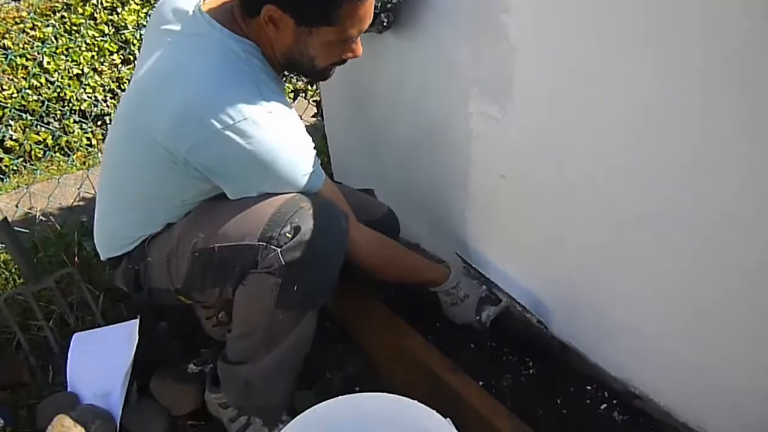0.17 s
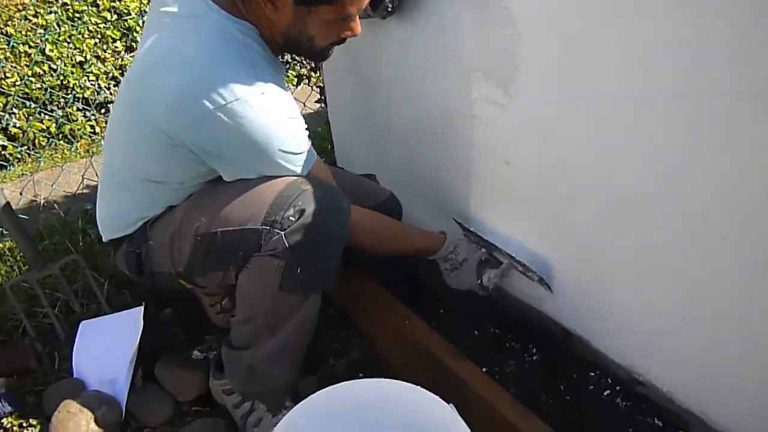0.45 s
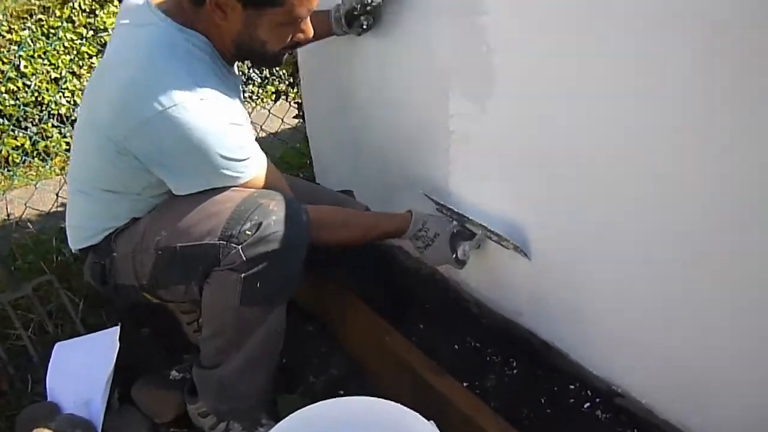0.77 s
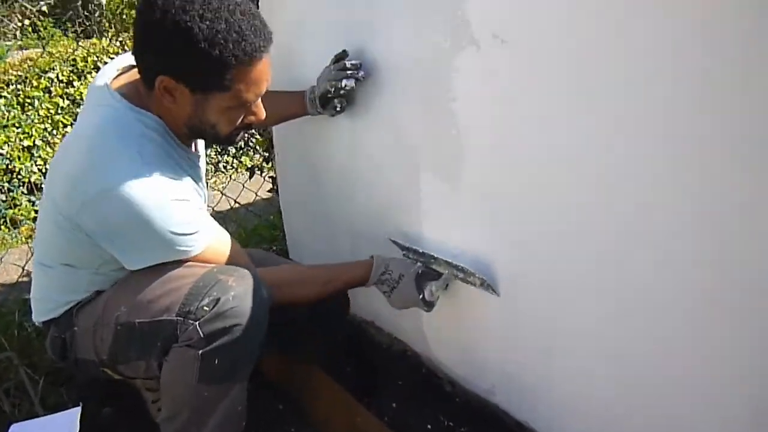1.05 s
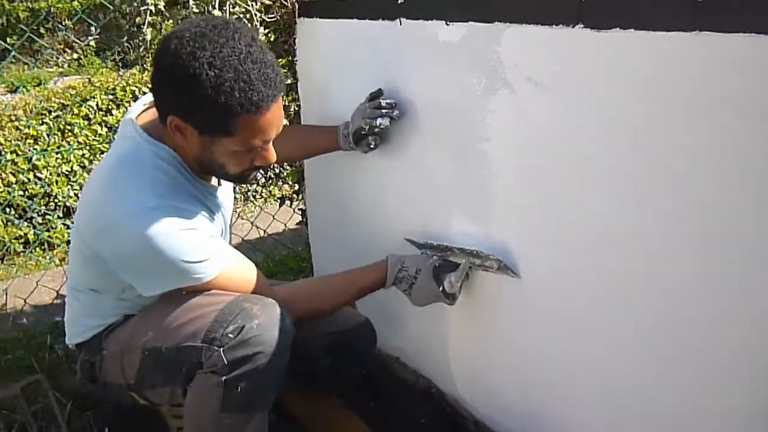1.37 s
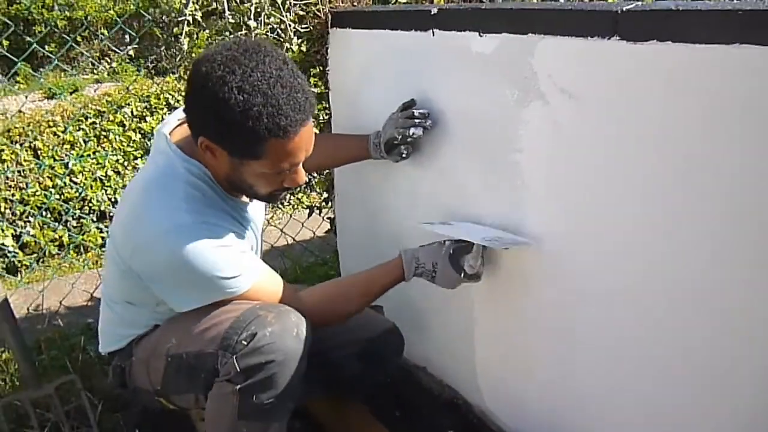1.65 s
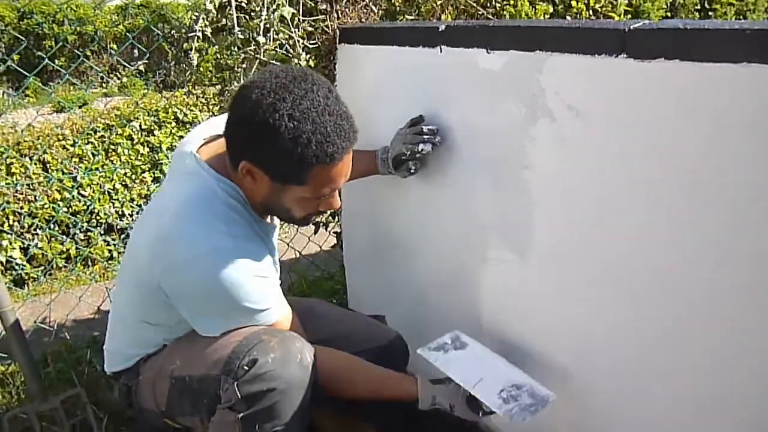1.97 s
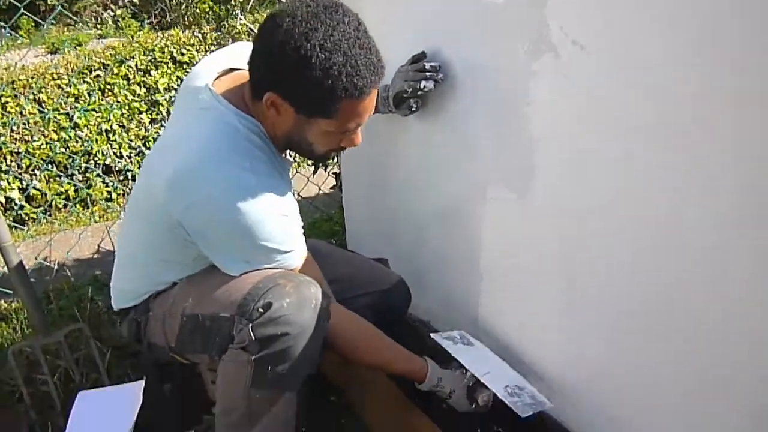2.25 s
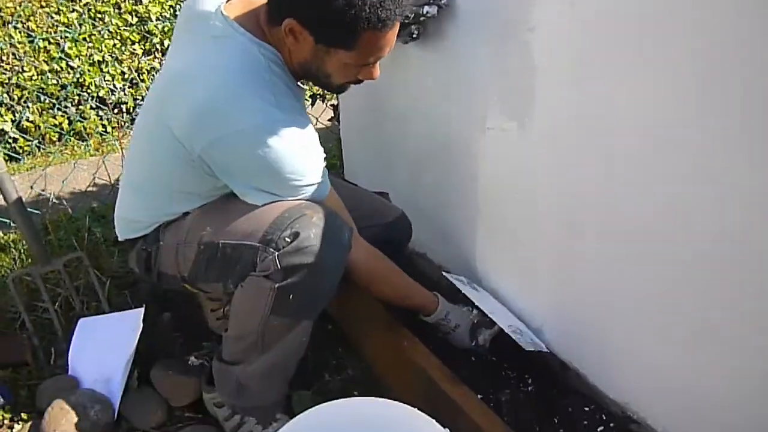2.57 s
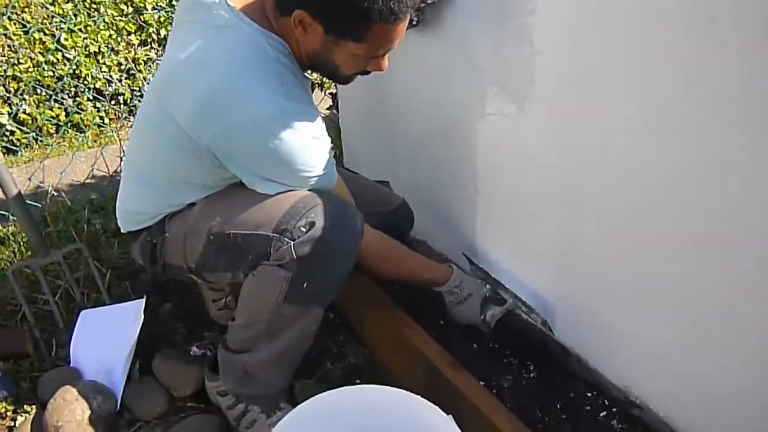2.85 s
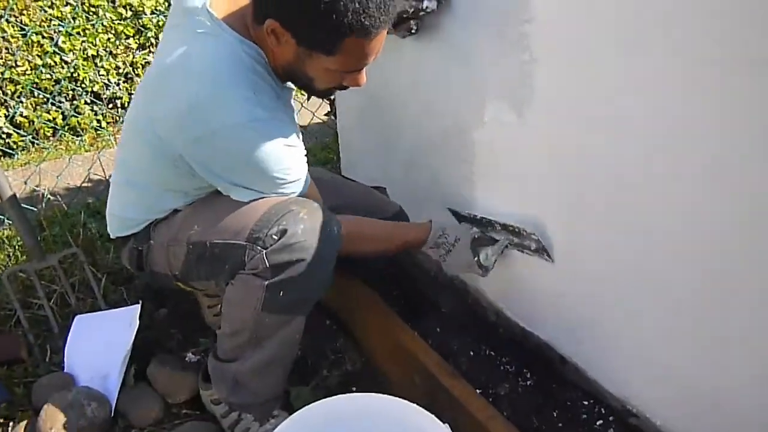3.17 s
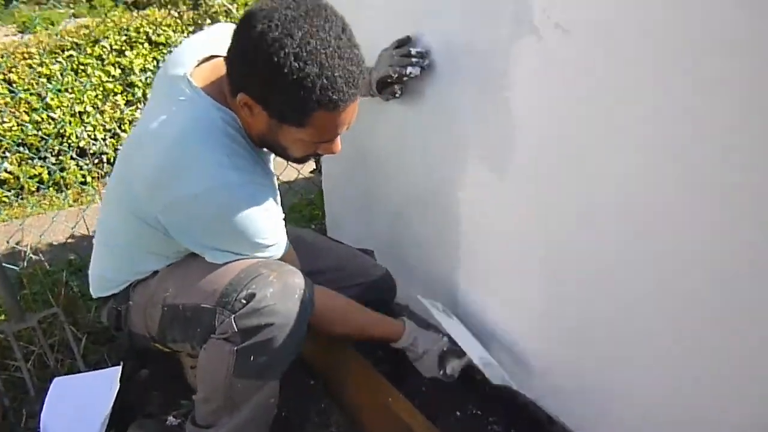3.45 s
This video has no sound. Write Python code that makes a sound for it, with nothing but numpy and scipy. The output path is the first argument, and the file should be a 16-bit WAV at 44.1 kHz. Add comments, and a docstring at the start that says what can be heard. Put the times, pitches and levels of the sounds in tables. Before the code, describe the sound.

A steel trowel scrapes wet render on an outdoor wall in one long rasping stroke, sand grains knocking against the blade. After a pause with light taps, a shorter stroke follows. Wind rumbles on the microphone.

```python
"""A steel trowel is pulled up a wall of wet render in two rasping strokes, outdoors.
Sand grains catch under the blade and ring it; coarse ones snag with a knock, and the ground echo
sweeps down as the blade rises. The blade hums hollowly during the strokes and taps lightly around
them. Gusts buffet the microphone over quiet air and two faint whistles; wall and yard scatter
the trowel's sound."""
import sys
import numpy as np
from scipy import signal
from scipy.fft import rfft, irfft
from scipy.io import wavfile
from scipy.ndimage import uniform_filter1d

SR = 44100
rng = np.random.default_rng(int(sys.argv[2]) if len(sys.argv) > 2 else 0)


def pcm_store(signal):
    """Save signal as 16-bit PCM."""
    levels = np.round(np.clip(np.atleast_2d(signal), -1, 1) * 32767)
    wavfile.write(sys.argv[1], SR, levels.astype(np.int16).T)


N = 158760
T, HZ = np.arange(N) / SR, np.fft.rfftfreq(N, 1 / SR)


def amp(db):
    """Decibels to gain."""
    return 10 ** (np.asarray(db) / 20)


def unit(x):
    """Scale to rms 1."""
    return x / np.sqrt(np.mean(x ** 2) + 1e-20)


def curve(points):
    """(time, value) points interpolated to every sample."""
    return np.interp(T, *np.transpose(points))


def colour(x, points):
    """Minimum-phase filter through (Hz, dB) points."""
    hz, db = np.transpose(points)
    log_hz = np.log(abs(np.fft.fftfreq(N, 1 / SR)) + 1)
    log_gain = np.log(amp(np.interp(log_hz, np.log(hz), db)))
    response = np.exp(np.conj(signal.hilbert(log_gain)))
    return irfft(rfft(x) * response[:len(HZ)], N)


def cut(x, hz, kind, order=3):
    """Butterworth low-, high- or band-pass."""
    return signal.sosfilt(signal.butter(order, hz, kind, fs=SR, output="sos"), x)


def wander(hz):
    """Smooth random signal, rms 1, rolling off above hz."""
    return unit(irfft(rfft(rng.standard_normal(N)) / (1 + (HZ / hz) ** 4), N))


def add(mix, start_s, sound):
    """Mix a sound in at start_s."""
    part = mix[max(round(start_s * SR), 0):][:len(sound)]
    part += sound[:len(part)]


def burst(t, decay_s):
    """Exponentially decaying white noise."""
    return rng.standard_normal(len(t)) * np.exp(-t / decay_s)


def ring(modes, t, detune, rise_s=0.0007):
    """Decaying modes; pitch and phase vary per blow."""
    out = np.zeros(len(t))
    for hz, db, t60_s in modes:
        detuned_hz = hz * (1 + detune * rng.standard_normal())
        out += amp(db - 60 * t / t60_s) * np.sin(2 * np.pi * (detuned_hz * t + rng.random()))
    return out * (1 - np.exp(-t / rise_s))


def resonate(x, hz, width_hz):
    """Unity-gain resonance following a pitch curve."""
    carrier = np.exp(2j * np.pi * np.cumsum(hz) / SR)
    pole = np.exp(-np.pi * width_hz / SR)
    return 2 * (carrier * signal.lfilter([1 - pole], [1, -pole], x / carrier)).real


def scatter(x, t60_s, start_s=0):
    """Convolve with a decaying noise tail of energy 1."""
    t = np.arange(SR // 2) / SR
    tail = rng.standard_normal(len(t)) * amp(-60 * t / t60_s) * (t >= start_s)
    return signal.fftconvolve(x, tail / np.linalg.norm(tail))[:N]


# rumble envelope (time [s], level [dB])
WIND_LEVEL = [(0,-17.5),(0.075,-17.5),(0.11,-26),(0.55,-25),(0.78,-36),(0.9,-27.5),(1.15,-34.5),(1.62,-36.5),(1.72,-49.5),(1.83,-35.5),(2.22,-42.5),(2.8,-42.5),(2.93,-50),(3.2,-32),(3.35,-47.5),(3.4,-23.5),(3.5,-27),(3.6,-46)]
# rumble spectrum (frequency [Hz], gain [dB])
WIND_SPECTRUM = [(25,-26),(50,-11),(90,0),(150,0),(300,-12),(500,-22)]
# pressure pulses (time [s], level [dB], pitch [Hz])
BUFFETS = [(0.011,-12.5,213),(0.021,-13.5,250),(0.05,-9,265),(0.069,-4.5,202),(0.312,-7,136),(0.424,-10,228),(3.442,-21.5,207),(3.483,-17,210)]


def wind(flutter_db=3.5, buffet_cycles=0.44):
    """Gusts on the microphone: lumpy rumble and sharp buffets of pressure."""
    rumble = cut(colour(rng.standard_normal(N), WIND_SPECTRUM), 335, "low")
    flutter = amp(flutter_db * wander(hz=22))
    out = unit(rumble * flutter) * amp(curve(WIND_LEVEL))
    for s, db, hz in BUFFETS:
        cycles = (T - s) * hz
        out += amp(db) * np.exp(-(cycles / buffet_cycles) ** 2) * np.cos(2 * np.pi * cycles)
    return cut(out, 40, "high", order=2)


# background spectrum (frequency [Hz], gain [dB])
AIR_SPECTRUM = [(300,0),(650,-1),(1100,-5),(2300,-9),(3000,-16),(6000,-24),(15500,-35)]


def air(level_db=-51):
    """Quiet, steady outdoor noise."""
    noise = colour(rng.standard_normal(N), AIR_SPECTRUM)
    return amp(level_db) * unit(cut(noise, 540, "high"))


# faint tones (start [s], length [s], first pitch [Hz], last pitch [Hz], level [dB])
WHISTLES = [(-0.05,0.243,1370,1437,-48.5),(2.421,0.94,1194,1038,-51.5)]


def whistles(jitter=0.0097):
    """Thin distant tones that swell, glide a little and fade."""
    out = np.zeros(N)
    for start_s, length_s, first_hz, last_hz, db in WHISTLES:
        progress = np.clip((T - start_s) / length_s, 0, 1)
        hz = (first_hz + (last_hz - first_hz) * progress) * (1 + jitter * wander(hz=52))
        swell = np.sqrt(4 * progress * (1 - progress))
        out += amp(db) * swell * np.sin(2 * np.pi * np.cumsum(hz) / SR)
    return out


# light touches (time [s], ring level [dB], grit level [dB])
TAPS = [(0.06,-28.5,-27.5),(1.754,-30.5,-38),(2.023,-27,-36),(2.794,-29.5,-25),(3.526,-27.5,-35)]
# free trowel modes (frequency [Hz], relative level [dB], t60 [s])
FREE_MODES = [(846,5,0.12),(1025,-3,0.081),(1270,-2,0.045),(1481,8,0.025),(1588,-7.5,0.15),(2060,-2.5,0.048)]
# grit passband (low edge [Hz], high edge [Hz])
TAP_GRIT_HZ = [250, 3030]


def taps(rise_s=0.004):
    """A short scuff of grit rings the lifted trowel softly."""
    out, t = np.zeros(N), np.arange(8192) / SR
    onset = 1 - np.exp(-t / rise_s)
    for s, ring_db, grit_db in TAPS:
        scuff = burst(t, decay_s=0.0064)
        tone = signal.fftconvolve(scuff, ring(FREE_MODES, t, detune=0.015))[:len(t)]
        grit = cut(burst(t, decay_s=0.009), TAP_GRIT_HZ, "band", order=1)
        add(out, s, (amp(ring_db) * tone / abs(tone).max() + amp(grit_db) * grit) * onset)
    return out


# coarse grains (time [s], knock peak [dB], crack peak [dB], pitch [Hz])
SNAGS = [(0.161,-22,-23.5,595),(0.2235,-28,-24,1120),(0.2535,-3.5,-18,597),(0.283,-19,-18,700),(0.359,-7,-15,620),(0.391,-9,-19,1057),(0.4405,-8.5,-21,600),(0.5395,-9.5,-14,1100),(0.5975,-15,-36,1033),(0.6475,-11,-24,1100),(0.677,-11,-24,1070),(0.7035,-7,-16,1210),(0.79,-10,-22,1074),(0.82,-10,-25,1080),(0.8445,-10.5,-25,1150),(1.0595,-20,-13,1080),(1.1835,-13,-16.5,1730),(1.2395,-12.5,-22,1900),(2.915,-40,-25,1200),(2.9755,-16,-14.5,1180),(3.125,-15,-20,1370)]
# pressed blade modes (pitch ratio [1], relative level [dB], t60 [s])
PRESSED_MODES = [(1,-2.5,0.023),(1.7,-6.5,0.01)]


def snags():
    """A coarse grain cracks and knocks the pressed blade; pitch depends on where it catches."""
    out, t = np.zeros(N), np.arange(2048) / SR
    for s, knock_db, crack_db, hz in SNAGS:
        modes = [(hz * ratio, db, t60_s) for ratio, db, t60_s in PRESSED_MODES]
        knock = ring(modes, t, detune=0.01)
        crack = cut(burst(t, decay_s=0.0026), 5800, "low", order=1)
        add(out, s, amp(knock_db) * knock / abs(knock).max() + amp(crack_db) * crack / abs(crack).max())
    return out


def grains(rate_per_s=1700, spread_db=2.5, spots=24):
    """Uneven sand grains catch at spots along the edge, each spot with its own tick."""
    size = amp(spread_db * np.minimum(rng.exponential(1, N), 4))
    clicks = size * rng.choice([-1, 1], N) * (rng.random(N) < rate_per_s / SR)
    spot = rng.integers(0, spots, N)
    t = np.arange(256) / SR
    ticks = [unit(burst(t, decay_s=0.0007)) for _ in range(spots)]
    return unit(sum(signal.oaconvolve(clicks * (spot == k), ticks[k])[:N] for k in range(spots)))


# response of the blade on the wall (frequency [Hz], gain [dB])
BLADE_SPECTRUM = [(200,0.5),(330,-6),(620,0),(860,-7.5),(1040,-4),(1250,-4),(1480,-7),(1950,-6),(2600,-14),(3200,-12),(4700,-15.5),(6600,-22.5),(7350,-27),(11500,-25.5),(13000,-23),(15500,-34)]
# narrow ring of the scraping edge (time [s], frequency [Hz], gain [dB])
EDGE_RING = [(0.3,1060,6.5),(0.7,1120,5.5),(0.96,965,8.5),(1.2,1000,-16),(1.39,1120,-0.5),(1.55,994,8.5),(3.1,1260,-4),(3.23,1070,6.5)]
# broad resonance of the flexed blade (time [s], frequency [Hz])
FLEX_PITCH = [(0.3,1150),(0.72,1240),(0.95,1750),(1.22,2350),(1.4,1870),(3.13,2420),(3.21,1240)]


def blade(drive, flex_db=-5):
    """Blade response; edge ring and flex resonance shift as it turns and tilts."""
    body = colour(drive, BLADE_SPECTRUM)
    s, edge_hz, edge_db = np.transpose(EDGE_RING)
    edge = amp(np.interp(T, s, edge_db)) * resonate(body, np.interp(T, s, edge_hz), width_hz=110)
    flex = amp(flex_db) * resonate(body, curve(FLEX_PITCH), width_hz=1100)
    return body + edge + flex


# echo lag (time [s], delay [ms])
GROUND_DELAY = [(0.25,1.72),(0.7,1.98),(1.25,2.8),(1.6,2.95),(2.9,1.8),(3.25,1.95)]
# echo colour (frequency [Hz], gain [dB])
GROUND_SPECTRUM = [(800,1.5),(2500,-7)]


def ground_echo(x, gain=0.21):
    """Dulled ground reflection, arriving later as the blade climbs."""
    delay_s = curve(GROUND_DELAY) / 1000
    return gain * colour(np.interp(T - delay_s, T, x), GROUND_SPECTRUM)


# rasp band levels, one list per stroke (time [s], low [dB], mid [dB], upper [dB], treble [dB])
STROKES = [
    [(0.185,-48,-50,-57,-60),(0.23,-37.5,-34.5,-40.5,-41.5),(0.275,-33,-45,-47,-49.5),(0.29,-21,-20,-27,-34),(0.322,-32.5,-29.5,-29,-37),(0.345,-28,-32,-32.5,-37),(0.375,-25.5,-26,-28.5,-35.5),(0.55,-26.5,-26.5,-31,-32),(0.82,-28.5,-24.5,-29.5,-32),(0.875,-41.5,-28.5,-35.5,-38.5),(0.915,-30,-23.5,-29,-31.5),(1.126,-33.5,-23,-29,-35),(1.3,-33,-20,-28,-33),(1.564,-32.5,-23,-28.5,-35.5),(1.603,-42,-35.5,-45,-49),(1.66,-71,-64,-57,-68)],
    [(2.868,-60,-51,-59,-63),(2.89,-44.5,-36.5,-42,-49.5),(2.96,-36,-30.5,-33,-41.5),(3.055,-34,-23,-26,-31.5),(3.102,-36,-28.5,-29,-34.5),(3.117,-33,-18,-21,-28),(3.14,-33.5,-27,-28.5,-31.5),(3.163,-32,-24.5,-26.5,-32.5),(3.218,-30,-23.5,-25.5,-31),(3.252,-26,-25,-28,-34.5),(3.285,-51,-42,-50.5,-56),(3.32,-54,-49,-51,-68)],
]
# limits of the four bands (frequency [Hz])
BAND_EDGES_HZ = [240, 800, 2300, 6000, 16000]


def rasp(paste_db=-7, judder_db=0.5, flicker_db=0.5):
    """Sand and smooth paste drive the juddering blade; each band follows the strokes and flickers."""
    friction = grains() + amp(paste_db) * rng.standard_normal(N)
    direct = blade(friction * amp(judder_db * wander(hz=73.4)))
    spectrum = rfft(direct + ground_echo(direct))
    out = np.zeros(N)
    for column, (low_hz, high_hz) in enumerate(zip(BAND_EDGES_HZ, BAND_EDGES_HZ[1:]), start=1):
        inside = (HZ >= low_hz) & (HZ < high_hz)
        band = irfft(spectrum * uniform_filter1d(inside.astype(float), size=400), N)
        flicker = amp(flicker_db * wander(hz=60))
        level = sum(amp(np.interp(T, stroke[:, 0], stroke[:, column], left=-200, right=-200))
                    for stroke in map(np.array, STROKES))
        out += unit(band * flicker) * level
    return out


def steel_ring(x, gain_db=-9.5):
    """The steel rings on briefly after each grain."""
    return amp(gain_db) * scatter(x, t60_s=0.047)


def friction_swell(s, half_s, hz, db, width_hz):
    """A swell of friction noise in one narrow blade resonance."""
    pitch_hz = np.full(N, hz)
    tone = rng.standard_normal(N)
    for _ in range(2):
        tone = resonate(tone, pitch_hz, width_hz)
    return amp(db) * unit(tone) * np.exp(-((T - s) / half_s) ** 2)


# hollow blade hums (centre [s], half length [s], pitch [Hz], level [dB])
HUMS = [(0.578,0.13,607,-30.5),(1.16,0.2,429,-38),(1.444,0.14,705,-32.5),(3.167,0.02,467,-20),(3.206,0.044,566,-28),(3.237,0.043,1076,-28.5)]


def hums_and_squeak():
    """The blade hums hollowly during the strokes; its edge squeaks briefly near the end of stroke one."""
    hum = sum(friction_swell(*row, width_hz=99) for row in HUMS)
    squeak = friction_swell(s=1.56, half_s=0.01, hz=6550, db=-33, width_hz=350)
    return hum + squeak


def wall(x, gain_db=-29.5):
    """Bright early scatter off the wall."""
    return amp(gain_db) * cut(scatter(x, t60_s=0.018), 3300, "high", order=1)


def yard(x, gain_db=-38.5):
    """Short dull scatter from fence and hedge."""
    return amp(gain_db) * cut(scatter(x, t60_s=0.56, start_s=0.011), 4020, "low", order=1)


def scene():
    """All sources centred; only wall and yard scatter differ between channels."""
    scrape = rasp()
    trowel = scrape + steel_ring(scrape) + hums_and_squeak() + snags() + taps()
    side = wall(trowel)
    centre = trowel + wind() + air() + whistles()
    return centre + np.array([yard(trowel) + side, yard(trowel) - side])


def record(dry):
    """Band limit at 15.7 kHz."""
    lowpass = signal.firwin(401, 15700, window=("kaiser", 9), fs=SR)
    return signal.oaconvolve(dry, lowpass[None], "same")


dry = scene()
out = record(dry)
pcm_store(out)
```